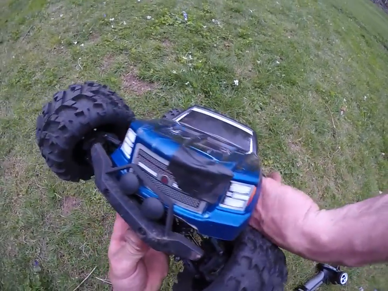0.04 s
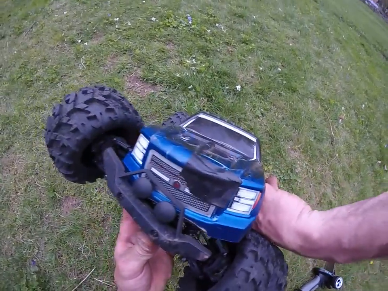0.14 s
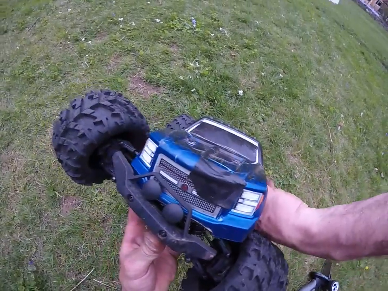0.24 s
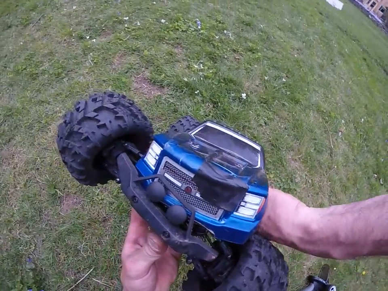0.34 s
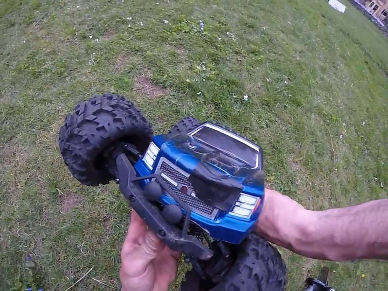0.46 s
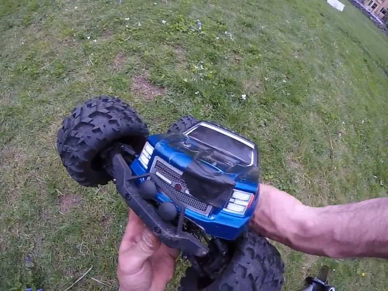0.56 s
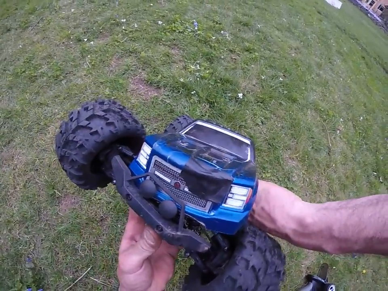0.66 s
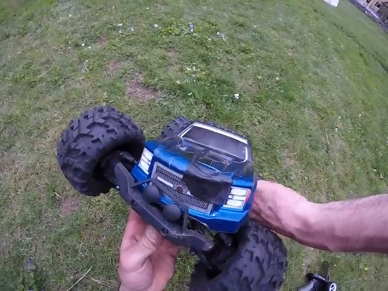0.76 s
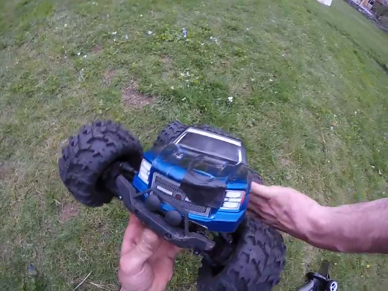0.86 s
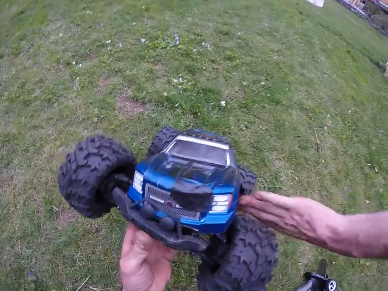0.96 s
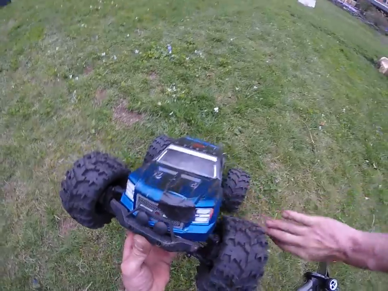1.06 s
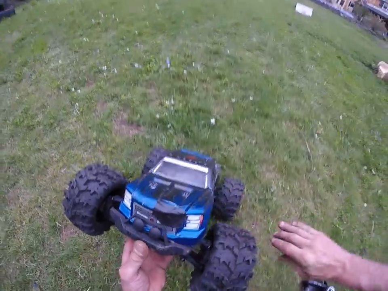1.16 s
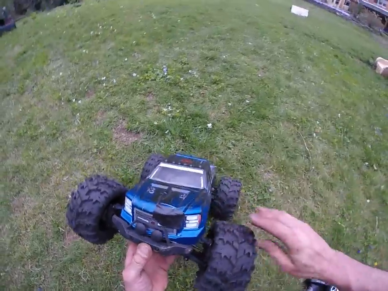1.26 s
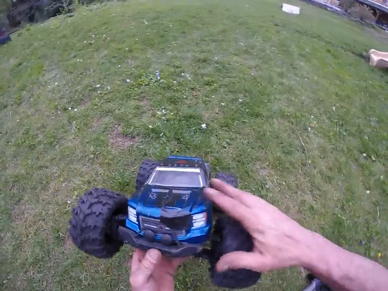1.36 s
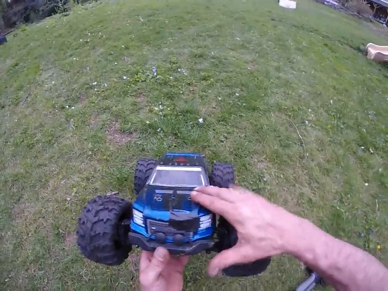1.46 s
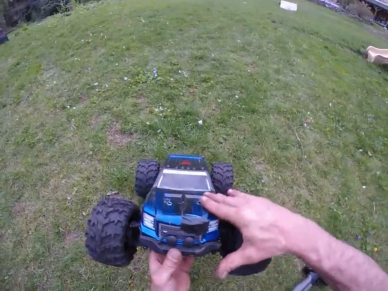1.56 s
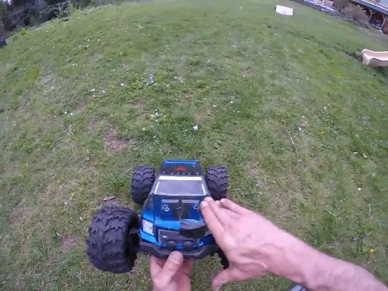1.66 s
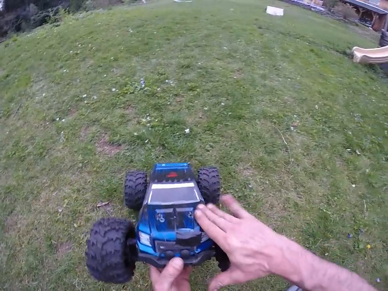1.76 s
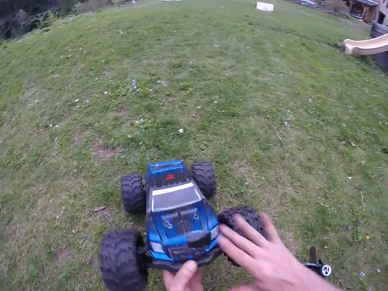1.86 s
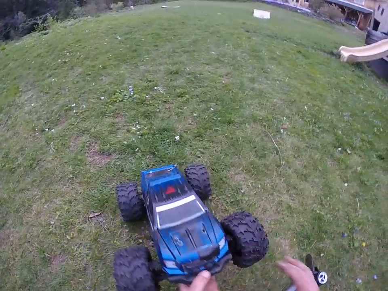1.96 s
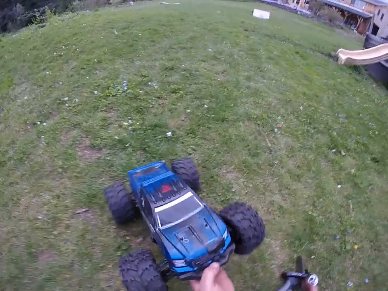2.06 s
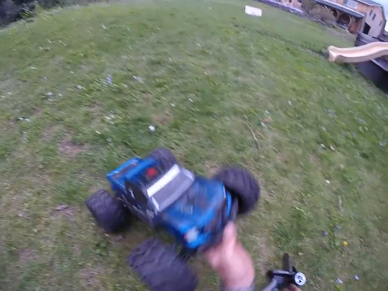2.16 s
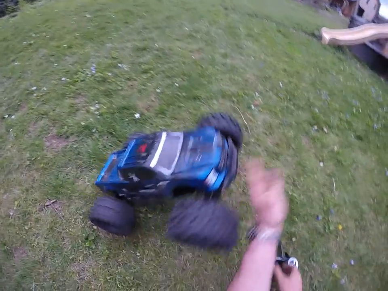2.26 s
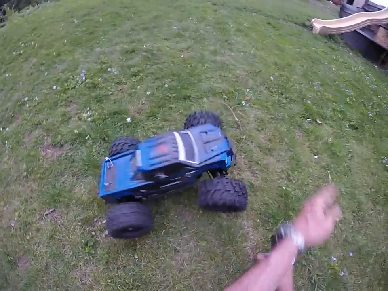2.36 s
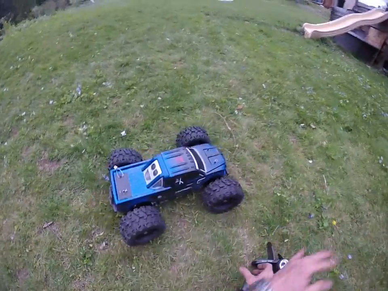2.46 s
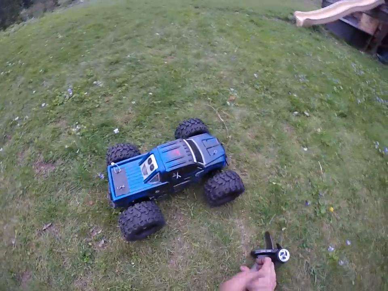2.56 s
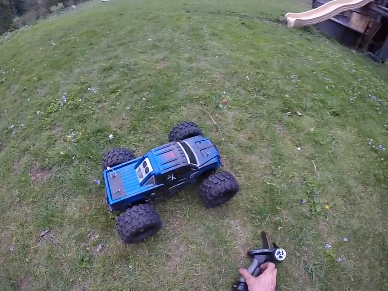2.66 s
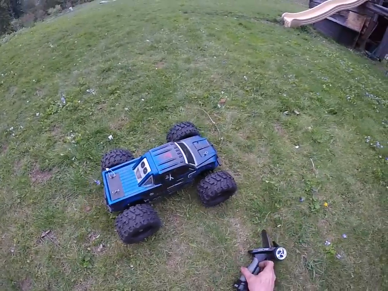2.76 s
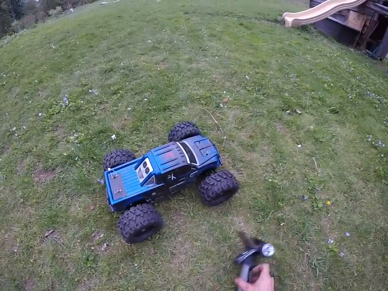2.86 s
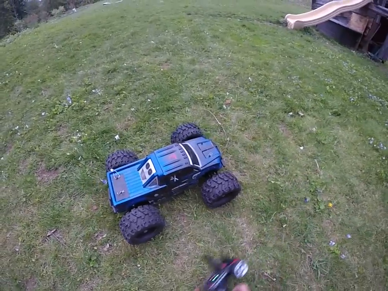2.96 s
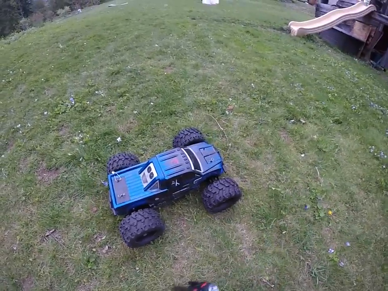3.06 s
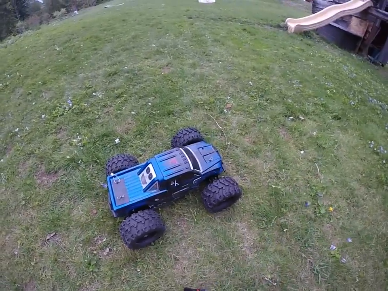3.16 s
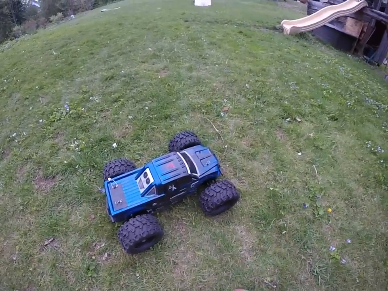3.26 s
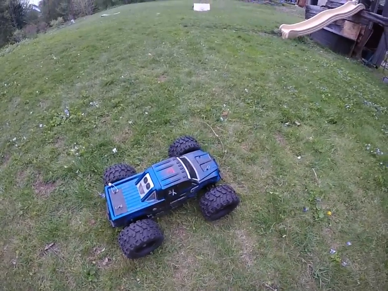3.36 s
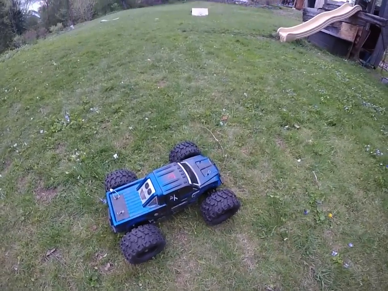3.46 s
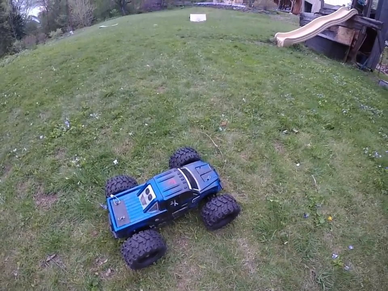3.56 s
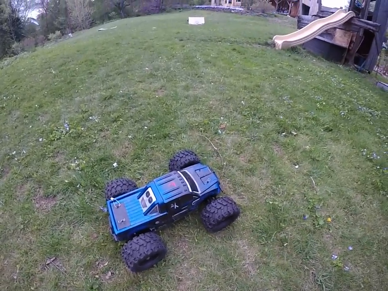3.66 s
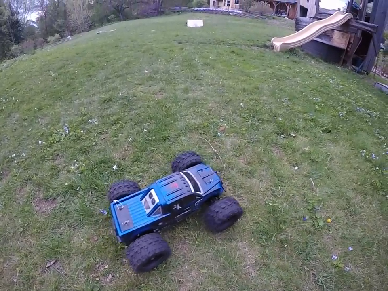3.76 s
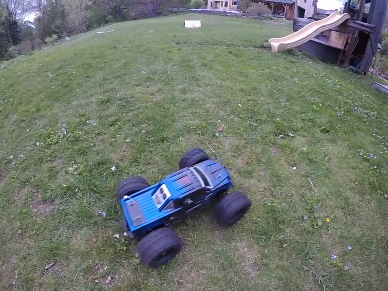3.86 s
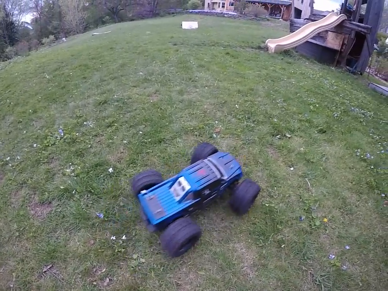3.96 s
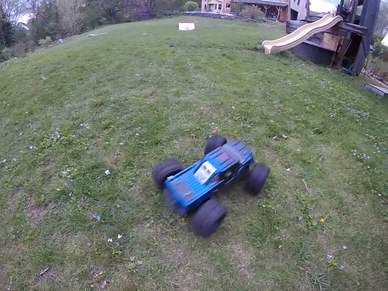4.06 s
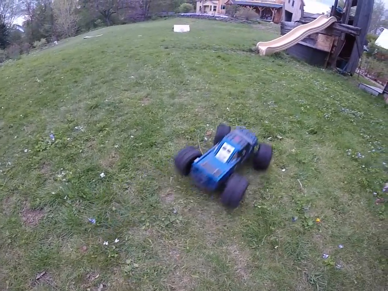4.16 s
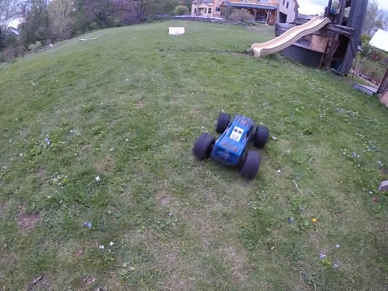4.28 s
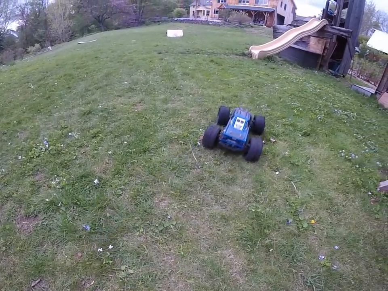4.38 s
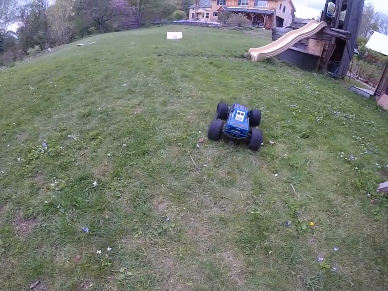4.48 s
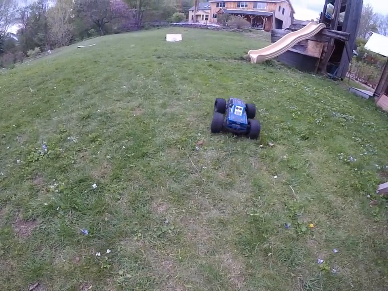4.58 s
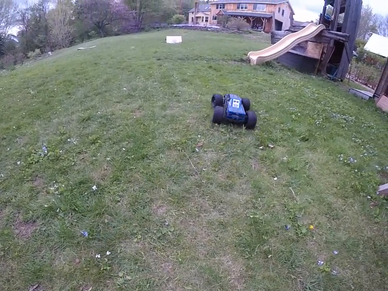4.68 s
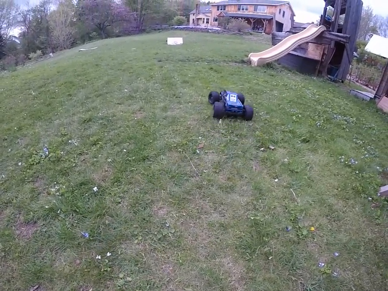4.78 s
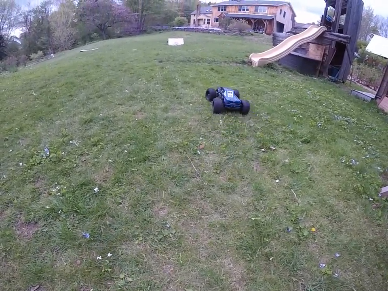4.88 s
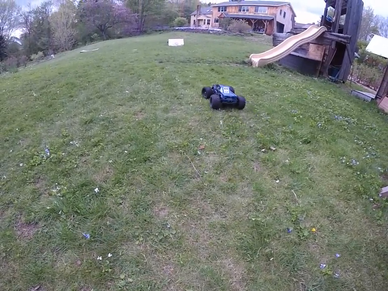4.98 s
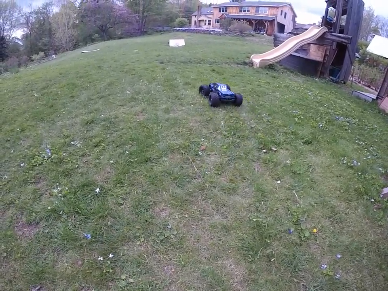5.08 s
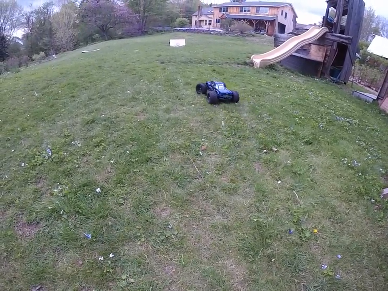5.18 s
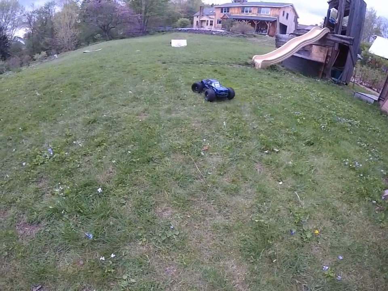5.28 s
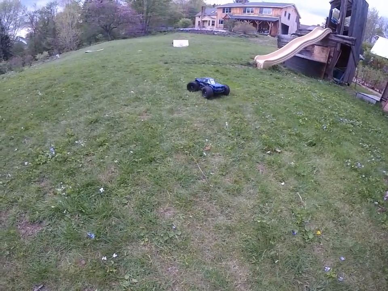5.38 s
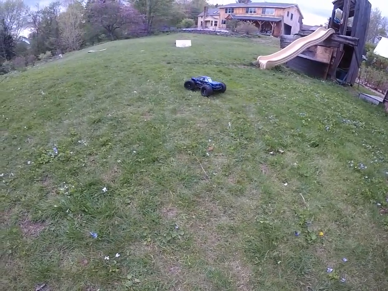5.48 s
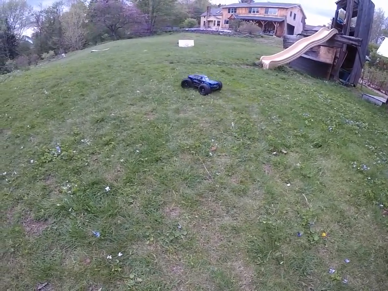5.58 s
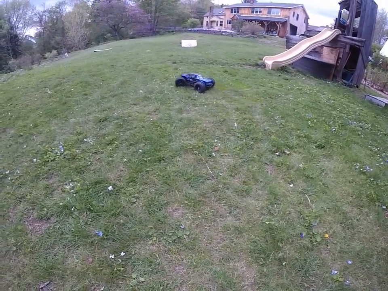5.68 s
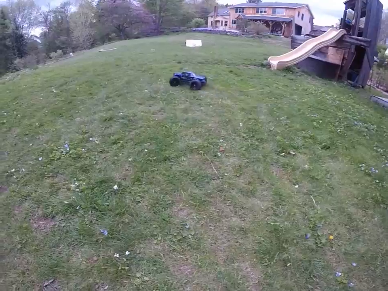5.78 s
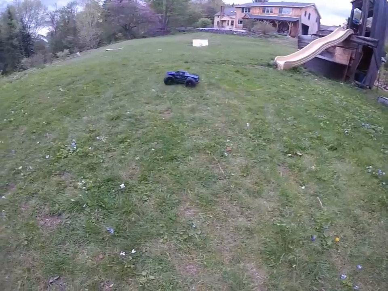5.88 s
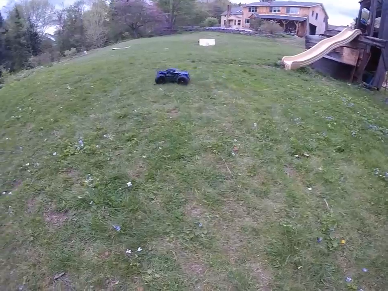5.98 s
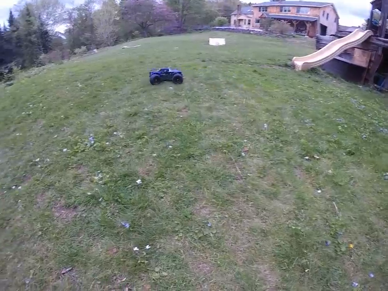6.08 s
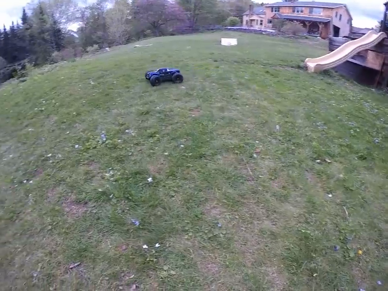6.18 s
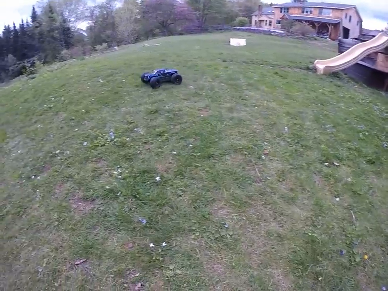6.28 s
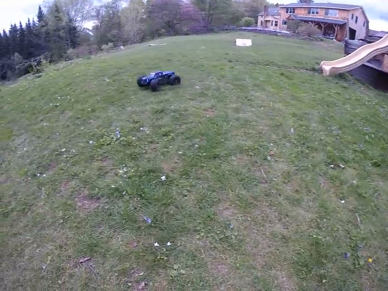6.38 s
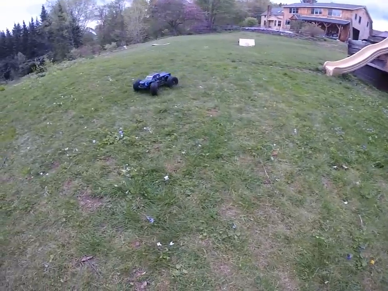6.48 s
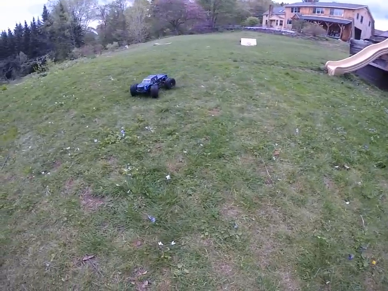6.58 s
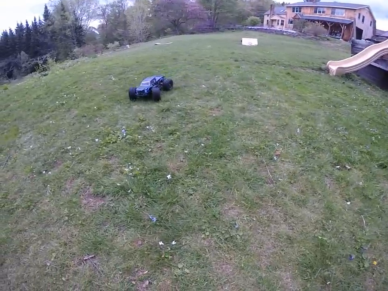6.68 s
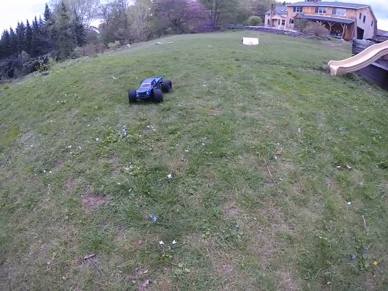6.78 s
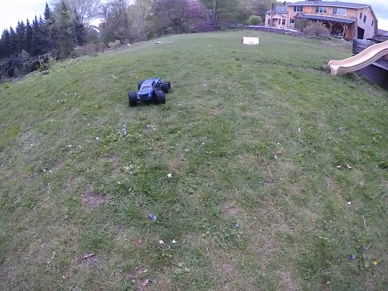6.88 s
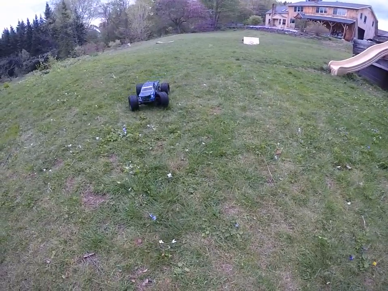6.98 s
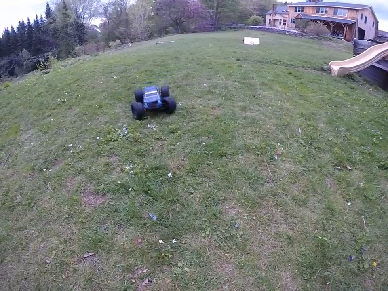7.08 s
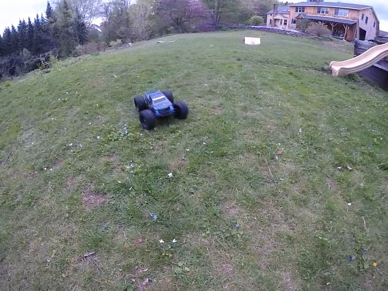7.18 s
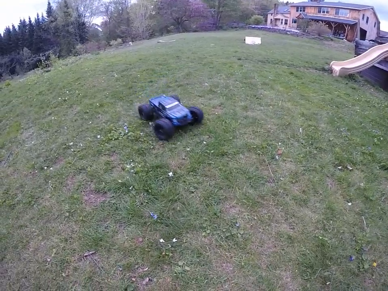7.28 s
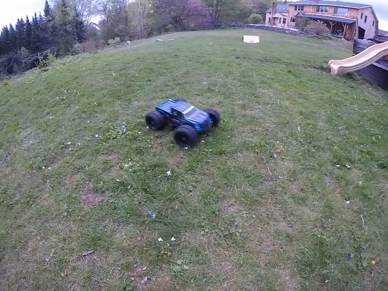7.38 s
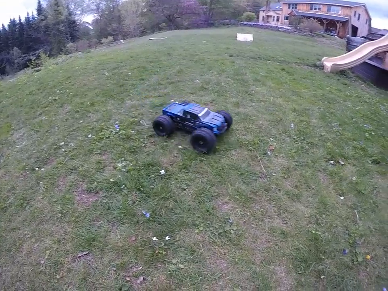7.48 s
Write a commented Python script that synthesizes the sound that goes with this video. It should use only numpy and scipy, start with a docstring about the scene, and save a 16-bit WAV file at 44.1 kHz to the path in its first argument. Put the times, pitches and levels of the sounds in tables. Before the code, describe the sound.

A remote-controlled model truck is handled near the microphone: skin rubbing, light plastic clicks, sharp knocks and dull rubber thuds. It slides from the hand and lands with a rattle. Then come a short hush, a thin bird note, and a stuttering gear whine, loud at first, followed by shorter, more distant bursts, clacking coasts and a final rough burst coming closer. Open lawn, wide stereo, little bass.

```python
"""On a lawn, a radio-controlled model truck is turned in the hands, tossed down and driven off in five bursts.
Noise-fed resonances make the clicks, knocks and scuffs of its plastic shell; decaying sines make the tyre thuds.
The motor jolts, then whines in harmonics of the gear mesh rate, with tooth rasp and clacking links.
Falling sine notes are small birds far off, over a filtered-noise hush.
A body-worn camera with a wide stereo image listens."""
import sys
import numpy as np
from scipy import signal
from scipy.fft import rfft, irfft, next_fast_len
from scipy.io import wavfile
from scipy.ndimage import uniform_filter1d

SR = 44100
rng = np.random.default_rng(int(sys.argv[2]) if len(sys.argv) > 2 else 0)


def pcm_store(signal):
    """Save signal as 16-bit PCM."""
    levels = np.round(np.clip(np.atleast_2d(signal), -1, 1) * 32767)
    wavfile.write(sys.argv[1], SR, levels.astype(np.int16).T)


N = 332514
T = np.arange(N) / SR

# bursts of throttle: (start [s], end [s], relative slack clack level [dB], relative controller whistle level [dB],
#   shell resonance facing the camera [Hz], relative gear rasp level at full load [dB],
#   shell rattle against the overtones [dB])
BURST_ROWS = [(3.74, 4.244, -35, -52.5, 1950, -39, -9), (4.51, 4.74, -25.5, -54, 1958, -36, -3.5),
              (5.175, 5.363, -29.5, -58, 1620, -38, -2), (5.541, 6.064, -27, -55, 2045, -41.5, -6.5),
              (6.926, 7.372, -26, -73, 1910, -35, -10)]
# blows in the hands and on landing: (time [s], relative click level [dB], click centre [Hz],
#   relative shell ring level [dB], chassis ring against it before trim [dB])
KNOCK_ROWS = [(0.2987, -17, 3260, -43, -2), (1.042, -13.5, 4200, -32, 2), (1.052, -25, 3600, -37, 12.5),
              (1.098, -26.5, 3750, -38.5, 3), (1.1521, -23, 3500, -34, -14), (1.458, -25, 3750, -36.5, 6),
              (1.477, -30, 3000, -37.5, -14), (2.4873, -13, 2850, -35, -8),
              (2.5284, -13.5, 5000, -32, -5.5), (2.566, -21.5, 5200, -41, -17)]
# chassis resonances: (centre [Hz], width [Hz], level [dB])
CHASSIS_MODES = [(360, 200, -6.5), (597, 113, 8), (740, 760, -0.5), (941, 180, 4)]
# shell resonances: (centre [Hz], width [Hz], level [dB])
BODY_MODES = [(1150, 270, -16), (1316, 43, -2.5), (1620, 160, -2.5), (1930, 120, -1.5), (2300, 95, -12.5)]
# driveshaft resonances, rung by rolling and by the links: (centre [Hz], width [Hz], level [dB])
SHAFT_MODES = [(650, 59, 1), (2317, 61, 2), (3450, 114, -1.5)]
# bright spectrum of rasp, crushed grass and skin hiss: (frequency [Hz], relative level [dB])
RASP_SPECTRUM = [(1530, -8), (2600, -8), (3220, -3.5), (5370, -9.5), (7870, -12.5), (10800, -36),
                 (11400, -84), (13600, -29), (15000, -59)]


def undb(db):
    """Decibels to a gain."""
    return 10 ** (np.asarray(db) / 20)


def unit(x):
    """Scale to rms 1."""
    return x / np.sqrt(np.mean(x ** 2) + 1e-20)


def curves(rows):
    """Join the rows of a table by straight lines."""
    s, *columns = np.transpose(rows)
    return [np.interp(T, s, c) for c in columns]


def gate(rows):
    """Open from the first row to the last, with soft edges."""
    return uniform_filter1d(1. * ((T > rows[0][0]) & (T < rows[-1][0])), size=400)


def walk(rate):
    """Smooth random wander, spread 1."""
    k = max(int(SR / rate), 2)
    steps = np.repeat(rng.standard_normal(N // k + 1), k)
    return unit(uniform_filter1d(steps, k)[:N])


def colour(x, points):
    """Filter by a spectrum of (frequency [Hz], level [dB]) points."""
    hz, db = np.transpose(points)
    n = next_fast_len(len(x) + 512)
    f = np.fft.rfftfreq(n, 1 / SR) + 1
    gain = undb(np.interp(np.log(f), np.log(hz), db))
    return irfft(rfft(x, n) * gain, n)[:len(x)]


def band(x, hz, width):
    """One resonance, gain 1 at the centre."""
    hz = min(hz, SR / 3)
    return signal.lfilter(*signal.iirpeak(hz, hz / min(width, SR / 4), fs=SR), x)


def ring(x, modes):
    """A body with several resonances, of alternating sign."""
    return sum((-1) ** k * undb(db) * band(x, hz, width) for k, (hz, width, db) in enumerate(modes))


def response(hz, modes):
    """Gain of a body's resonances at a moving frequency."""
    return sum(undb(db) / (1 + ((hz - f) / width) ** 2) for f, width, db in modes)


def grit(spread_db):
    """Dense tiny contacts of uneven strength."""
    return rng.standard_normal(N) * undb(spread_db * walk(400))


def contact(decay_s, chatter):
    """A blow, then chatter that swells and dies as the parts settle."""
    t = T[:4096] / decay_s
    push = chatter * rng.standard_normal(len(t)) * np.sqrt(t) * np.exp(-t)
    push[0] += 1
    return push


def add(out, s, x, db):
    """Mix in a sound at a time and peak level."""
    i = max(int(s * SR), 0)
    out[i:i + len(x)] += (undb(db) * x / np.abs(x).max())[:N - i]


def scatter(x, decay_s):
    """Diffuse reflections of the same power as the sound."""
    tail = rng.standard_normal(8192) * np.exp(-T[:8192] / decay_s)
    return signal.fftconvolve(x, tail / np.linalg.norm(tail))[:N]


def motor():
    """Gear teeth mesh unevenly; overtones flare at shell and gearbox resonances, over a rasp of tooth clatter."""
    # motor speed, one list per burst: (time [s], gear mesh rate before unevenness [Hz])
    mesh_speed = [
        [(3.975, 395), (3.985, 488.4), (4.005, 530.3), (4.022, 628), (4.042, 676.6), (4.065, 606), (4.09, 619),
         (4.122, 792), (4.175, 772.5), (4.21, 863), (4.24, 757)],
        [(4.53, 499), (4.545, 610), (4.58, 656.4), (4.61, 604), (4.66, 686), (4.72, 547)],
        [(5.19, 415), (5.225, 474), (5.27, 568.4), (5.35, 468)],
        [(5.605, 560), (5.625, 636.3), (5.65, 575.5), (5.69, 772.5), (5.735, 730), (5.78, 602.5), (5.81, 755),
         (5.85, 800), (5.87, 944), (5.91, 1038), (5.935, 999), (5.97, 1238), (5.995, 1160), (6.02, 1389),
         (6.04, 1046)],
        [(7.005, 449.8), (7.028, 648.5), (7.045, 700), (7.065, 652), (7.095, 626), (7.12, 705.4), (7.18, 655),
         (7.37, 655)],
    ]
    # gearbox housing resonances: (centre [Hz], width [Hz], level [dB])
    gearbox_modes = [(3096, 52, -0.5), (3420, 120, -5.5), (4170, 110, -3.5)]
    mesh_hz = curves([row for burst in mesh_speed for row in burst])[0]
    # above 750 Hz the wheels skip and the unevenness grows
    unevenness = 0.011 * walk(110) + 0.02 * walk(600)
    hz = mesh_hz * (1 + unevenness * np.maximum(mesh_hz / 750, 1))
    phase = 2 * np.pi * np.cumsum(hz) / SR
    facing_rows = [(s, f, db) for start, end, _, _, f, _, db in BURST_ROWS for s in (start, end)]
    facing_hz, rattle_db = curves(facing_rows)
    mesh_gain, octave_gain, upper_gain, rasp_gain = drive()

    # the upper overtones share their level by nearness to the shell resonance
    nearness = np.array([1 / (1 + ((k * hz - facing_hz) / 380) ** 2) ** 2 for k in range(3, 6)])
    upper_gains = upper_gain * nearness / np.linalg.norm(nearness, axis=0)
    tones = 0
    for k, gain in enumerate([mesh_gain, octave_gain, *upper_gains], 1):
        partial = np.sin(k * phase + 0.25 * walk(120) + 0.07 * k * walk(700))
        # each partial swells and sinks by itself as the truck rocks
        tones = tones + gain * unit(partial * undb(1.6 * walk(70)))
    # an off-centre pinion throbs once a turn, and no two teeth bite alike
    throb = 1 + 0.2 * np.sin(phase / 11) + 0.22 * walk(400)

    chassis = unit(band(ring(grit(3.0), CHASSIS_MODES), 630, 330))
    growl = undb(rattle_db - 4) * mesh_gain * chassis
    shell = unit(band(ring(grit(5.4), BODY_MODES), 2700, 1500))
    rattle = undb(rattle_db) * np.hypot(octave_gain, upper_gain) * shell

    teeth = sum(np.sin(k * phase + 1.3 * walk(500)) * undb(4 * walk(140)) for k in range(3, 13))
    clatter = unit(colour(grit(3.9) * (1 + 0.46 * np.cos(phase)), RASP_SPECTRUM))
    rasp = clatter + undb(1) * unit(colour(teeth, RASP_SPECTRUM))
    gearbox = unit(sum(response(k * hz, gearbox_modes) * np.sin(k * phase + 1.1 * walk(300))
                       for k in range(3, 8)))
    # faster teeth clatter more: 11.5 dB per octave of mesh rate
    rasp = (rasp + undb(-0.5) * gearbox * throb) * undb(11.5 * np.log2(mesh_hz / 775))
    return undb(-0.7) * tones * throb + growl + rattle + undb(-6.0) * rasp_gain * rasp


def drive():
    """Gains of mesh tone, octave, upper overtones and rasp; rasp follows the load more weakly than the tones."""
    # whine rising and sinking as the wheels bounce, one list per burst: (time [s],
    #   relative mesh tone level [dB], relative octave level [dB], relative upper overtone level [dB])
    load_rows = [
        [(3.952, -32, -55, -30), (3.97, -26, -39, -32), (3.986, -35, -37.5, -27.5), (4.008, -39, -30, -34),
         (4.024, -34, -26, -32), (4.045, -41, -25, -32), (4.056, -20, -30, -28), (4.08, -24.5, -32, -38),
         (4.1, -29, -23, -30), (4.116, -51, -21, -50), (4.132, -27, -27, -46), (4.16, -34, -23, -46),
         (4.182, -37, -22, -52), (4.192, -53, -40, -52), (4.24, -40, -28.5, -57)],
        [(4.535, -43, -54, -29), (4.553, -34, -59, -37), (4.586, -42.5, -47, -30), (4.612, -46, -54, -43),
         (4.634, -37, -59, -31), (4.665, -49, -40, -45), (4.69, -58, -61, -48), (4.725, -40, -58, -51)],
        [(5.19, -40.5, -57, -56), (5.23, -39.5, -45, -46.5), (5.283, -45, -57, -43.5), (5.36, -54.5, -54, -60)],
        [(5.56, -40, -50, -42), (5.595, -34.5, -61, -32), (5.626, -28, -52, -46), (5.645, -37.5, -64, -28.5),
         (5.685, -39.5, -34.5, -40.5), (5.74, -45, -40, -39.5), (5.765, -27.5, -55, -39),
         (5.797, -36, -52, -44), (5.815, -44, -34.5, -44), (5.895, -44, -38, -51), (5.92, -40.5, -32.5, -49),
         (5.97, -37.5, -42, -46), (6.02, -34.5, -41, -57), (6.04, -49, -44, -62)],
        [(6.98, -45, -48, -43), (7.02, -38.5, -53, -37.5), (7.035, -41, -34, -28), (7.058, -52, -46, -32.5),
         (7.085, -40, -59, -28), (7.12, -43.5, -32, -31), (7.142, -48, -43, -44), (7.162, -46, -50, -25),
         (7.195, -44, -34, -38), (7.228, -64, -65, -28.5), (7.245, -39, -37, -49), (7.3, -45, -54, -35),
         (7.33, -42.5, -46, -50), (7.37, -51, -61, -52)],
    ]
    gains = np.zeros((4, N))
    for rows, (*_, rasp_db, _) in zip(load_rows, BURST_ROWS):
        tones = undb(curves(rows))
        load = np.linalg.norm(tones, axis=0)
        rasp = undb(rasp_db) * (load / load.max()) ** 0.32  # 0.32 dB of rasp for each dB of load
        gains += gate(rows) * np.array([*tones, rasp])
    return gains


def whistle():
    """The windings sing at the controller's switching rate, fading in and out as the truck turns and rocks."""
    feed = sum(undb(db) * gate([(start,), (end,)]) for start, end, _, db, *_ in BURST_ROWS)
    switching_hz = 8050
    tone = np.sin(2 * np.pi * switching_hz * T + 0.9 * walk(70))
    return feed * unit(tone * undb(3.5 * walk(22)))


def rattles():
    """Loose links strike and bounce back a few milliseconds later."""
    out = np.zeros(N)
    for s, peak_db in shakes():
        for delay_s, db in [(0, 0), (rng.uniform(0.0032, 0.007), -8)]:
            link = band(contact(decay_s=0.0023, chatter=0.48), 1500, 1360)
            clack = band(link, 3850, 950) + undb(-1.0) * band(link, 6140, 600)
            clack = clack + undb(-9.5) * ring(link, SHAFT_MODES)
            add(out, s + delay_s, clack, peak_db + db)
    return out


def shakes():
    """When the links clack: singly, in pairs as the throttle opens, and with each slowing turn of the wheels."""
    # single clacks of the loose links, from motor jolts, coasting or bumps: (time [s], peak level [dB])
    single_clacks = [(3.8292, -20), (3.866, -39), (3.9, -25), (3.932, -30), (4.199, -27.5), (4.319, -30),
                     (4.5472, -26), (4.629, -37), (5.475, -35), (5.4961, -31.5), (6.0491, -27.5),
                     (7.418, -27), (7.5167, -29.5)]
    # coasting, a loose link clacks twice every wheel turn: (time [s], first peak level [dB], second peak level [dB])
    coast_clacks = [(4.2915, -21.5, -26), (4.375, -21, -34), (4.464, -25.5, -29.5), (4.7191, -27.5, -23.5),
                    (4.817, -29, -27), (4.931, -32.5, -31), (5.073, -25, -42), (6.117, -31, -39),
                    (6.185, -28.5, -33), (6.2518, -27, -45), (6.3375, -30, -30.5), (6.427, -36.5, -31),
                    (6.541, -31, -30.5), (6.68, -34, -33.5)]
    slack_s, rebound_s = 0.0084, 0.017  # gap as the drivetrain takes up its play; gap when coasting
    hits = list(single_clacks)
    for start, _, db, *_ in BURST_ROWS:
        hits += [(start, db), (start + slack_s, db)]
    for s, first_db, second_db in coast_clacks:
        hits += [(s, first_db), (s + rebound_s, second_db)]
    return hits


def tyres():
    """Treads drum on the ground and crush grass; the turning driveshafts whirr."""
    # tyres on grass: (time [s], relative rumble level [dB], relative crackle level [dB])
    roll_levels = [(3.72, -42, -33), (4.05, -37.5, -22), (4.96, -60.5, -41.5), (5.88, -42.5, -31),
                   (6.62, -53, -43), (7.54, -45.5, -26.5)]
    rumble_db, crackle_db = curves(roll_levels)
    rumble = unit(colour(grit(4.0), [(90, -63), (140, -1.5), (300, 2.5), (620, -1.0),
                                     (950, -31.0), (1800, -6.0), (3000, -60.0)]))
    whirr = unit(ring(grit(4), SHAFT_MODES))
    rolling = undb(rumble_db - 1.5) * (rumble + undb(-7 + 3.2 * walk(25)) * whirr)
    crackle = undb(crackle_db - 17.5) * unit(colour(grit(5.1), RASP_SPECTRUM))
    return gate(roll_levels) * (rolling + crackle)


def knocks():
    """Blows and jolts of the motor ring the shell and, at their own balance, the chassis below it."""
    # the rotor jolts before it spins: (time [s], relative shell ring level [dB])
    jolts = [(3.741, -29.5), (3.7763, -35), (3.836, -23.5), (3.8639, -27.5), (3.906, -22), (3.93, -22.5),
             (3.9536, -26), (4.521, -26), (5.191, -41.5), (6.9414, -31.5)]
    out = np.zeros(N)
    blows = [(s, db, low_db) for s, _, _, db, low_db in KNOCK_ROWS]
    blows += [(s, db, -6) for s, db in jolts]
    for s, peak_db, low_db in blows:
        push = contact(decay_s=0.0026, chatter=1.0)
        add(out, s, ring(push, BODY_MODES), peak_db + 5.0)
        add(out, s, band(ring(push, CHASSIS_MODES), 760, 1400), peak_db + low_db + 6.5)
    return out


def clicks():
    """Hard plastic parts meet: a short broad ring over a faint bright crack."""
    # light plastic clicks: (time [s], relative peak level [dB], centre [Hz])
    light_clicks = [(0.282, -24, 3500), (0.8652, -25.5, 4250), (1.0332, -20.5, 6100), (1.2041, -29, 2960),
                    (1.445, -28, 4670), (1.5734, -17, 4300), (1.6896, -25.5, 2920), (1.8357, -29.5, 3930),
                    (2.392, -22, 3900), (2.463, -26, 3780), (2.594, -31.5, 5530)]
    out = np.zeros(N)
    for s, peak_db, hz in light_clicks + [(s, db, hz) for s, db, hz, _, _ in KNOCK_ROWS]:
        push = contact(decay_s=0.0021, chatter=0.2)
        broad_ring = band(band(push, hz, 2940), hz, 2940)
        add(out, s, broad_ring + undb(-46) * band(push, 6900, 9100), peak_db - 0.5)
    return out


def thuds():
    """Hollow tyres take a soft push and die in a few cycles."""
    # rubber tyre thuds: (time [s], relative peak level [dB], pitch [Hz])
    tyre_thuds = [(0.299, -32.5, 173), (0.573, -38, 574), (0.79, -34, 210), (1.046, -26, 224),
                  (1.198, -35, 175), (1.447, -23, 205), (1.459, -27, 269), (2.124, -35, 159),
                  (2.451, -23, 192), (2.486, -26.5, 274), (2.538, -30, 296), (6.099, -29.5, 150),
                  (6.158, -32.5, 151), (6.21, -38.5, 160), (6.389, -34.5, 166)]
    out, t = np.zeros(N), T[:4096]
    for s, peak_db, hz in tyre_thuds:
        tyre = np.sin(2 * np.pi * hz * t) * np.exp(-t / 0.012) * (1 - np.exp(-t / 0.0016))
        scuff = band(band(contact(decay_s=0.017, chatter=0.96), 230, 840), 230, 840)
        add(out, s, unit(tyre) + 0.57 * unit(scuff), peak_db - 0.5)
    return out


def slide():
    """A hollow scrape swells and dies as the truck leaves the hand."""
    # resonances of the scrape: (centre [Hz], width [Hz], level [dB])
    scrape_modes = [(747, 35, 5.5), (3430, 150, -16), (4040, 140, -15), (6500, 560, -16.5)]
    centre_s, spread_s, level_db = 2.15, 0.087, -40.5
    swell = np.exp(-((T - centre_s) / spread_s) ** 2)
    return undb(level_db) * swell * unit(ring(grit(1.6), scrape_modes))


def scuffs():
    """A fingertip slips and lets the shell chatter."""
    # short scuffs of the fingers: (time [s], relative peak level [dB])
    finger_scuffs = [(0.05, -34.5), (0.134, -40.5), (0.282, -27), (0.844, -30), (0.887, -35.5), (0.95, -37),
                     (1.021, -30), (1.518, -34.5), (1.855, -37.5)]
    out = np.zeros(N)
    for s, peak_db in finger_scuffs:
        push = contact(decay_s=0.0085, chatter=2.4)
        add(out, s, ring(push, CHASSIS_MODES + BODY_MODES), peak_db - 0.5)
    return out


def hands():
    """Skin drags over plastic and rubber."""
    # hands on shell and tyres: (time [s], relative rub level [dB], relative hiss level [dB])
    rub_levels = [(0.0, -37.5, -42), (0.38, -53, -45.5), (0.83, -63, -44.5), (0.99, -41.5, -40.5),
                  (1.22, -53, -50), (1.77, -46.5, -49), (2.1, -38.5, -46.5), (2.41, -41.5, -40),
                  (2.58, -39.5, -53), (2.7, -51, -54)]
    # dull body of the rub: (frequency [Hz], relative level [dB])
    rub_spectrum = [(76, -39), (130, 2.5), (325, -4), (771, -5), (863, -10), (1520, -12), (1920, -7.5),
                    (2600, -42), (3380, -54), (5720, -120)]
    rub_db, hiss_db = curves(rub_levels)
    rub = undb(rub_db - 6.5) * unit(colour(grit(5.4), rub_spectrum))
    hiss = undb(hiss_db - 7.0) * unit(colour(grit(1.5), RASP_SPECTRUM))
    return gate(rub_levels) * (rub + hiss)


def cloth():
    """Ribbed threads slide over each other with a rough zipping tone."""
    # cloth sliding as the arms move: (time [s], length [s], mean thread rate at start [Hz], at end [Hz],
    #   relative peak level [dB], hiss against the tone [ratio])
    cloth_swishes = [(2.316, 0.09, 1490, 1760, -33.5, 0.64), (2.386, 0.036, 2050, 1816, -44, 0.83),
                     (2.42, 0.059, 1305, 1724, -39.5, 1.15), (2.45, 0.078, 1840, 1625, -37, 2),
                     (7.409, 0.08, 1009, 708, -38.5, 0.59)]
    out = np.zeros(N)
    for s, length, start_hz, end_hz, db, hiss in cloth_swishes:
        n = int(length * SR)
        rate_hz = np.linspace(start_hz, end_hz, n) * (1 + 0.035 * hiss * walk(1500)[:n])
        phase = 2 * np.pi * np.cumsum(rate_hz) / SR
        threads = unit(sum(np.sin(k * phase) for k in range(1, 10))) + hiss * grit(2.5)[:n]
        zip_tone = colour(threads, [(1500, -1.5), (3200, 3), (4800, 12.0),
                                    (6700, 9.5), (9000, 1.5), (12000, -27)])
        zip_tone = zip_tone * undb(2.5 * walk(250)[:n])  # the threads catch and let go
        add(out, s, zip_tone * signal.windows.tukey(n, 0.8), db + 13.0)
    return out


def birds():
    """Thin falling notes, smeared by the trees."""
    # bird notes: (time [s], length [s], start pitch [Hz], end pitch [Hz], relative peak level [dB])
    bird_notes = [(0.97, 0.11, 7970, 6970, -48.5), (1.61, 0.034, 8100, 7050, -50),
                  (3.287, 0.049, 4390, 3780, -42.5), (3.397, 0.045, 8260, 6530, -48.5),
                  (5.373, 0.085, 4500, 3770, -46), (6.49, 0.033, 7730, 6480, -44.5)]
    out = np.zeros(N)
    for s, length, start_hz, end_hz, db in bird_notes:
        n = int(length * SR)
        phase = 2 * np.pi * np.cumsum(np.linspace(start_hz, end_hz, n)) / SR
        add(out, s, np.sin(phase) * signal.windows.tukey(n), db + 4.0)
    return undb(-6.5) * out + undb(-9.5) * scatter(out, decay_s=0.075)


def air():
    """Wide outdoor hush from two independent noises, a little rumble and a thin high hiss."""
    # outdoor hush: (frequency [Hz], relative level [dB])
    hush_spectrum = [(65, -51), (110, -31), (144, 0), (250, -6), (283, -8.5), (547, -14.5), (792, -19),
                     (993, -17.5), (1880, -19), (2260, -20.5), (3630, -21), (4190, -24), (5150, -23),
                     (10800, -30.5), (15000, -44)]
    # side against middle of the hush: (frequency [Hz], level [dB])
    side_spectrum = [(60, -11), (120, -6), (200, 1), (380, 2.5), (700, 11.5), (1290, 8), (2380, -1.5),
                     (4400, -6), (8100, 3.5), (15000, -7)]
    mid, side = (undb(-49.85 + 0.052 * walk(2.37)) * unit(colour(rng.standard_normal(N), hush_spectrum))
                 for _ in range(2))
    rumble = unit(colour(rng.standard_normal(N), [(20, 3.0), (60, 8), (110, -3), (250, -35)]))
    # a puff of wind gets past the filter
    puff_db = curves([(5.6, -11), (6.15, 4), (6.9, -10)])[0]
    rumble = undb(-66.0) * rumble * undb(puff_db)
    hiss = undb(-66.5) * unit(band(band(rng.standard_normal(N), 10470, 320), 10470, 320))
    return mid + rumble + hiss, colour(side, side_spectrum)


def scene():
    """Place the truck and birds in stereo by phase and level, with ground reflections and air."""
    # phase between side and middle as the truck moves: (time [s], phase [rad])
    bearing = [(0, 1.4), (2.6, 1.85), (4.05, 1.7), (4.55, 0.94), (5.25, 0.83), (5.65, 0.64), (6.0, 0.088),
               (7.1, 0.22), (7.5, 0.36)]
    truck = (clicks() + rattles() + knocks() + thuds() + motor() + tyres()
             + hands() + slide() + scuffs() + cloth())
    # the camera's wind filter takes away the bass
    near = colour(truck, [(50, -16), (100, -65), (135, 0.5), (300, 0.5)]) + birds()
    # the two ports differ most in the middle of the range, by the truck's bearing
    ports = colour(near, [(200, -45), (650, -42), (1250, -2.5), (2000, -0.5),
                          (2600, -9.5), (5000, -24), (8000, -13.0)])
    analytic = signal.hilbert(ports, next_fast_len(N))[:N]
    turned = np.real(analytic * np.exp(1j * curves(bearing)[0]))
    ground = colour(scatter(near, decay_s=0.0046), [(150, -15), (700, -10.5), (1800, 0.0),
                                                    (4000, -14.0), (9000, 3.0)])
    mid, side = air()
    # two separate whistles, so the tone sits wide
    mid = mid + near + undb(-14.0) * scatter(near, decay_s=0.051) + undb(-2) * whistle()
    side = side + turned + ground - 0.13 * near + whistle()
    return np.array([mid + side, mid - side])


def record(dry):
    """The camera cuts the top above 15.2 kHz with a steep low-pass."""
    return signal.sosfilt(signal.ellip(8, 0.2, 70, 15200, fs=SR, output="sos"), dry)


dry = scene()
out = record(dry)
pcm_store(out)
```